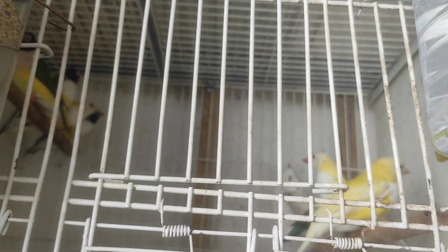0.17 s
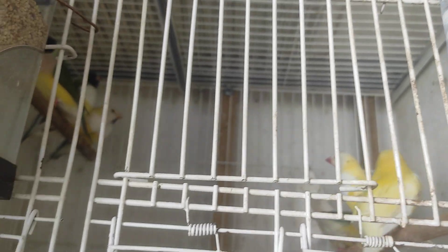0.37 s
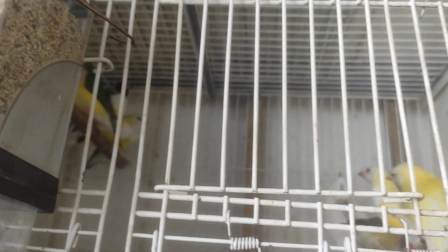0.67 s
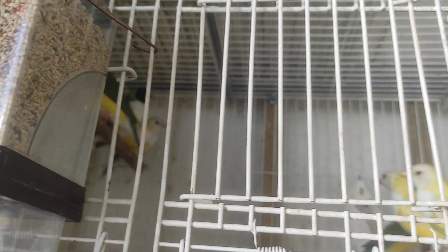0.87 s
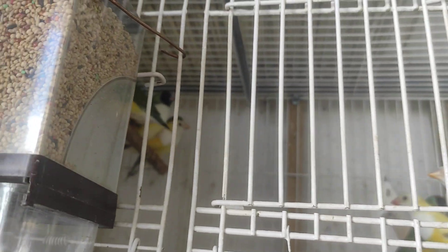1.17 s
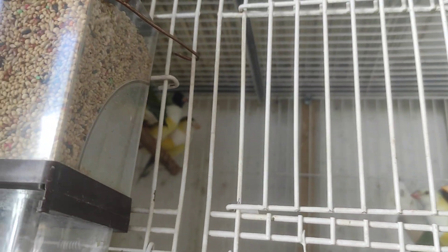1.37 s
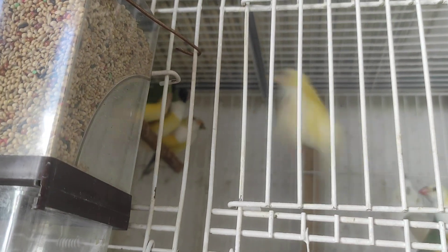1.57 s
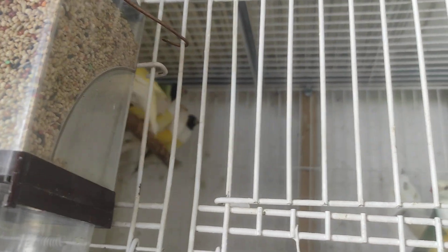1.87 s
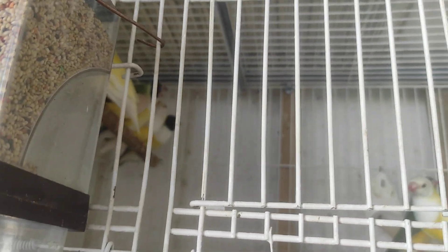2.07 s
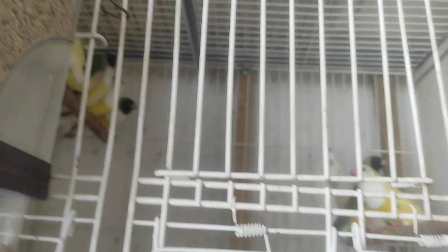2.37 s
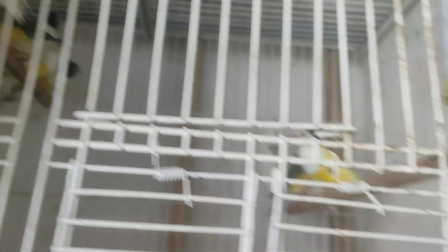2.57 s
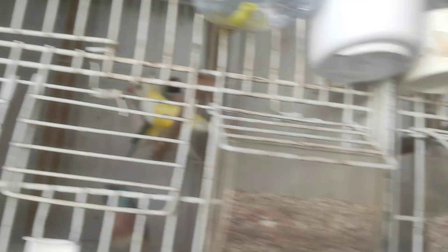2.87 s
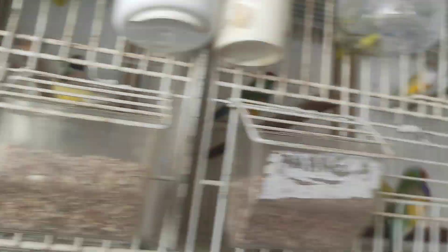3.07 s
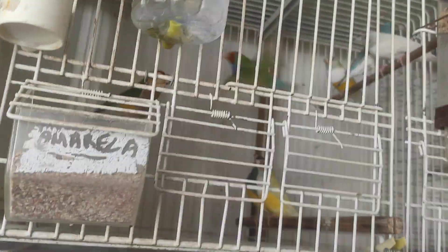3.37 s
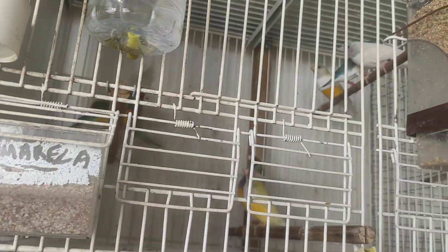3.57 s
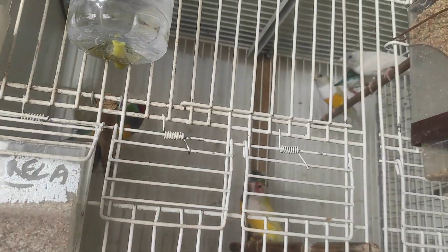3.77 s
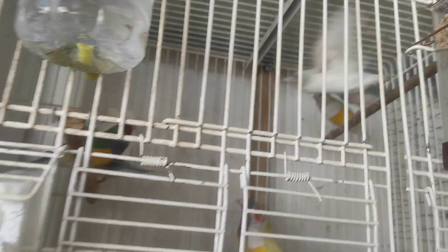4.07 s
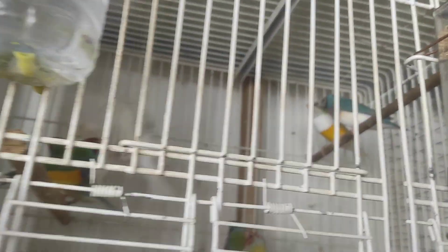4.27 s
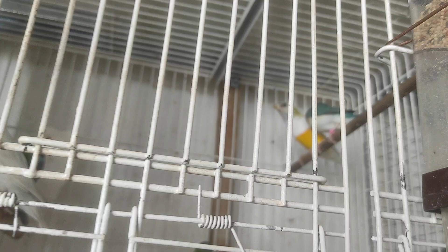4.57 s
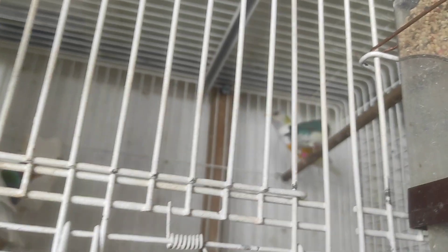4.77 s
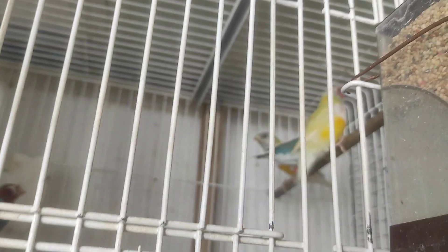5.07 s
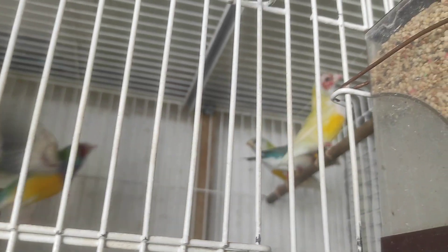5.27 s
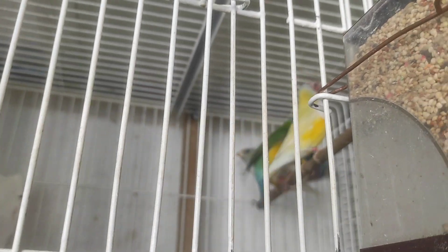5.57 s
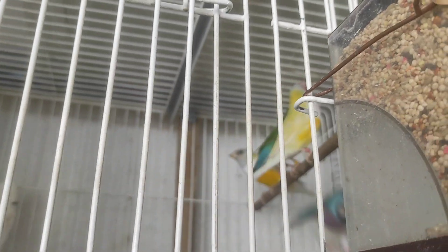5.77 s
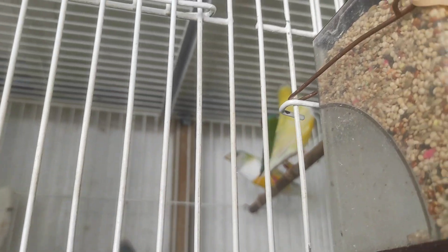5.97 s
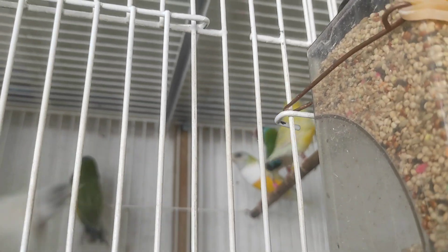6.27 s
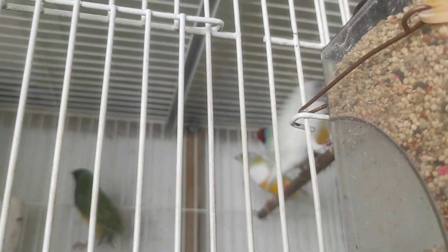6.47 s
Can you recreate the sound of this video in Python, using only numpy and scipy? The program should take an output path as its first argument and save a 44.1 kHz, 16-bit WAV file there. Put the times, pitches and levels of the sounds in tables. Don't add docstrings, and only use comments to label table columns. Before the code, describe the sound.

Finches whistle, peep and chatter hoarsely in a hard tiled room while wings flutter, claws tick on cage wire and a hand bumps the phone.

```python
import sys
import numpy as np
from scipy import signal
from scipy.fft import rfft, irfft, next_fast_len
from scipy.io import wavfile
from scipy.ndimage import uniform_filter1d, map_coordinates

SR = 44100
rng = np.random.default_rng(int(sys.argv[2]) if len(sys.argv) > 2 else 0)


def materialize(psi):
    bounded = np.clip(np.atleast_2d(psi).T, -1, 1)
    quanta = np.round(bounded * 32767).astype(np.int16)
    wavfile.write(sys.argv[1], SR, quanta)


def gain_from_decibels(decibels):
    exponent = np.asarray(decibels, float) / 20
    return 10 ** exponent


N = 292383

# frequency in Hz, level in dB per Hz.
WIRE_SPECTRUM = [(290, -35), (500, -9), (960, -5.5), (1090, -7.5), (2320, -7.5), (3300, -11.5), (5500, -29),
                 (7150, -50), (12100, -120)]
# frequency in Hz, level in dB per Hz.
FEATHER_SPECTRUM = [(1470, -21), (2500, -10), (3320, -14.5), (3720, -9.5), (4050, -8.5), (4370, -9.5),
                    (4750, -8.5), (5930, -6.5), (7580, -0.5), (8830, -5.5), (9830, -12.5), (14500, -21),
                    (15600, -25)]


def unit(x):
    return x / np.sqrt(np.mean(x ** 2) + 1e-20)


def along(points, hz):
    f, v = np.transpose(points)
    return np.interp(np.log(hz + 1), np.log(f + 1), v)


def wobble(rate, size):
    knots = rng.standard_normal(int(max(size, SR // 4) * rate / SR) + 4)
    return map_coordinates(knots, [np.arange(size) * rate / SR])


def sides(db):
    left = gain_from_decibels(db)
    return 2 * np.array([left, np.ones_like(left)]) / (1 + left)


def rush(spectrum, patchy_db):
    # frequency in Hz, left-right correlation as a ratio.
    likeness = [(60, 0.7), (180, 0.91), (550, 0.34), (1650, -0.066), (4970, 0.2), (15000, -0.5)]
    # frequency in Hz, left minus right in dB.
    port_balance = [(60, -0.5), (380, -1.5), (700, -2), (1290, -4), (2380, -8.5), (4400, -13.5),
                    (6000, -11.5), (7600, -18.5), (9500, -5.5), (15000, -2)]
    size = next_fast_len(N)
    z = signal.stft(rng.standard_normal((2, N + 512)), nperseg=512)[2]
    field = uniform_filter1d(rng.standard_normal(z.shape[1:]), size=6, axis=0)
    field = unit(uniform_filter1d(field, size=8, axis=1))
    patchy = z * gain_from_decibels(np.clip(patchy_db, 0, 2) * field)
    pair = rfft(signal.istft(patchy, nperseg=512)[1][:, :N], size)
    hz = np.fft.rfftfreq(size, 1 / SR)
    turn = np.arccos(np.clip(along(likeness, hz), -1, 1)) / 2
    mid, side = pair * [np.cos(turn), np.sin(turn)]
    ports = np.array([mid + side, mid - side])
    gain = gain_from_decibels(along(spectrum, hz)) * sides(along(port_balance, hz))
    x = irfft(ports * gain, size)[:, :N]
    return x / x.mean(axis=0).std()


def bursts(rows, db, rise, slower):
    power, t = np.zeros(N + SR), np.arange(SR // 2) / SR
    for (s, *_, t60), level in zip(rows, db):
        decay = gain_from_decibels(level - 60 * t / (slower * t60))
        start = max(round((s - rise) * SR), 0)
        power[start:][:len(t)] += (decay * (1 - np.exp(-t / rise))) ** 2
    return np.sqrt(power[:N])


def tail():
    # frequency in Hz, t60 in seconds.
    tile_decay = [(500, 0.083), (4000, 0.25), (10000, 0.16)]
    hz, t, z = signal.stft(rng.standard_normal((2, SR // 3)), SR, nperseg=256)
    fall_db = -60 * t / along(tile_decay, hz)[:, None]
    early = gain_from_decibels(fall_db / 0.6)
    late = gain_from_decibels(-9 + fall_db / 1.4)
    x = signal.istft(z * (early + late), SR, nperseg=256)[1]
    x *= 1 - np.exp(-np.arange(x.shape[1]) / SR / 0.0013)
    return x / np.linalg.norm(x[0])


def notes():
    # start in seconds, length in seconds, first pitch in Hz, last pitch in Hz, peak in dB.
    rises = [
        (.506, 0.028, 2955, 4300, -27.5),
        (2.1, .045, 3487, 4105, -27.5),
        (3.626, .056, 3130, 4050, -26.5),
        (3.996, .058, 3375, 4093, -25),
        (5.005, .055, 3510, 4310, -41.5),
        (6.148, 0.061, 3093, 3900, -28),
    ]
    # start in seconds, length in seconds, top pitch in Hz, held pitch in Hz, held level in dB.
    leaps = [
        (.232, 0.065, 5410, 4066, -19.5),
        (.808, 0.083, 5470, 4007, -18),
        (2.327, 0.075, 5100, 4025, -17.5),
    ]
    # start in seconds, length in seconds, first pitch in Hz, last pitch in Hz, peak in dB.
    peeps = [(.135, 0.051, 4080, 4100, -37), (.002, .085, 4530, 4400, -32), (.14, .045, 3520, 3900, -30),
             (.335, .1, 4110, 4080, -40), (3.668, .068, 4030, 4220, -35), (.18, 0.065, 3900, 4060, -29),
             (.306, 0.0255, 4470, 4036, -25.5), (.888, .014, 4060, 4070, -10.5),
             (.862, 0.012, 4035, 4044, -11.5), (.848, 0.031, 3715, 3820, -21),
             (1.1, 0.031, 2410, 2295, -54), (2.403, 0.061, 4074, 4100, -32.5),
             (2.887, 0.028, 4120, 3850, -34), (2.975, .068, 3810, 3800, -41),
             (2.912, 0.062, 3840, 3813, -30)]
    # start in seconds, length in seconds, first pitch in Hz, last pitch in Hz, peak in dB.
    chatter = [(0, 0.013, 4200, 4100, -24), (.02, .06, 2950, 2880, -39), (.805, .014, 4150, 4300, -25),
               (2.329, .024, 4750, 5000, -31), (.028, 0.045, 4330, 4295, -33),
               (.155, 0.03, 3350, 3450, -38), (.1, 0.048, 3600, 3680, -40), (.215, 0.029, 3500, 3770, -33),
               (.76, .03, 5850, 6100, -46.5), (.525, 0.028, 4300, 4250, -27.5),
               (.552, 0.06, 4240, 4280, -30.5), (.762, 0.036, 2660, 2920, -43.5),
               (.788, 0.032, 3450, 3770, -31), (.818, 0.041, 3450, 3820, -28.5),
               (4.28, 0.034, 5270, 5910, -45), (4.443, 0.046, 3650, 3690, -30),
               (4.452, 0.028, 4200, 4720, -30.5), (5.885, 0.021, 2730, 2440, -40),
               (6.188, 0.038, 4850, 4560, -36.5), (6.152, 0.058, 2680, 2680, -47),
               (6.32, .025, 2370, 2350, -51.5), (6.408, 0.051, 3156, 3170, -41),
               (6.41, 0.024, 5700, 5670, -39.5), (4.72, .06, 2990, 2970, -43), (.9, .012, 4650, 4720, -30),
               (.922, .016, 4650, 4750, -33), (2.886, .04, 4550, 4400, -43), (.1, .045, 5350, 5000, -44),
               (.515, .035, 3700, 3850, -35), (.56, .04, 3750, 3900, -35), (4.43, .04, 3050, 3200, -39),
               (4.748, .018, 5700, 5750, -42), (2.128, .05, 4230, 4150, -37), (.303, .025, 4900, 4500, -33),
               (.25, .055, 5400, 5250, -38), (.245, .08, 2950, 2850, -43), (.816, .035, 5500, 5350, -33),
               (.33, .05, 4850, 4800, -46), (2.335, .04, 5550, 5400, -43), (2.405, .03, 5300, 5250, -48),
               (.51, .04, 2950, 3000, -40), (.55, .045, 2800, 2950, -40), (4.0, .05, 2900, 3100, -42)]
    # start in seconds, length in seconds, first pitch in Hz, last pitch in Hz, peak in dB.
    coos = [
        (.2, 0.25, 553, 545, -51.5),
        (4.495, 0.048, 1450, 1513, -57),
        (4.82, 0.042, 985, 925, -46.5),
        (5.36, 0.0092, 1560, 840, -38),
        (6.02, 0.019, 1010, 980, -43),
        (6.54, 0.024, 950, 930, -46),
        (6.61, 0.014, 960, 910, -43),
    ]
    # start in seconds, length in seconds, first pitch in Hz, last pitch in Hz, peak in dB.
    buzzes = [
        (0, 0.028, 3730, 3580, -29.5),
        (.028, 0.049, 3420, 3590, -31.5),
        (.512, .025, 3490, 3760, -31.5),
        (.555, 0.044, 3274, 3620, -28.5),
        (.597, 0.029, 3625, 3510, -28.5),
        (2.086, 0.025, 3420, 3490, -36),
        (2.305, 0.03, 3480, 3450, -32),
        (4.42, 0.048, 2974, 3620, -34.5),
        (6.368, 0.034, 3470, 3790, -29),
    ]
    # start in seconds, length in seconds, first pitch in Hz, last pitch in Hz, peak in dB.
    sweeps = [
        (4.705, .07, 3257, 4380, -18.5),
        (6.385, 0.0514, 3700, 4326, -26.5),
    ]
    # left minus right in dB, octave level in dB, loudest moment as a share of the length,
    # loss at the start in dB, loss at the end in dB.
    rise_voice = (-15, -15, .55, 10.5, 11.5)
    leap_voice = (-15.5, -28, 2.5, 5, 4.5)
    peep_voice = (-16.5, -23.5, 0.2, 3.5, 5)
    chatter_voice = (-14, -16.5, 1.7, -0.5, 6)
    coo_voice = (-11.5, -29, -2, 5, 8)
    buzz_voice = (-17, -3.5, 0.44, 5.5, 6)
    sweep_voice = (-18, -19, 0.58, 15.5, 8)
    noisy_shares = .31, .1, .1, .42, .15, .3, .17
    # share of its height as a ratio, level in dB.
    side_strands = [(.35, -11), (-.35, -16), (.7, -14)]
    takeoff_hz, up_s, down_s = 3753, 0.019, 0.0065

    kinds = [(rises, rise_voice), (leaps, leap_voice), (peeps, peep_voice), (chatter, chatter_voice),
             (coos, coo_voice), (buzzes, buzz_voice), (sweeps, sweep_voice)]
    for (rows, (*voice, loudest, start_db, end_db)), hoarse in zip(kinds, noisy_shares):
        for s, length, a_hz, b_hz, db in rows:
            t = np.arange(0, length, 1 / SR)
            loss_at = [0, np.clip(loudest, 0.05, 0.95), 1]
            level_db = db - np.interp(t / length, loss_at, [start_db, 0, end_db])
            pitch = a_hz + (b_hz - a_hz) * (1 - (1 - np.minimum(t / length / 0.8, 1)) ** 1.3)
            if rows is leaps:
                height = np.where(t < up_s, t / up_s, np.exp(-(t - up_s) / down_s))
                floor_hz = np.where(t < up_s, takeoff_hz, b_hz)
                pitch = floor_hz * (1 - height) + a_hz * height
                level_db = level_db - 12.5 * height
                for reach, strand_db in side_strands:
                    strand = floor_hz + reach * (a_hz - b_hz) * height ** 0.5
                    yield s, strand, db + strand_db - 30 * (1 - height) ** 2, (*voice, 0.4)
            yield s, pitch, level_db, (*voice, hoarse)


def whistles():
    out = np.zeros((2, N + SR))
    left_lag = 20
    pulse_hz, attack_s, release_s = 220, 0.005, 0.03
    for s, pitch, db, (pan_db, overtone_db, rasp) in notes():
        t = s + np.arange(len(pitch)) / SR
        overtone_db = overtone_db - 23 * np.maximum(pitch / 1000 - 3.7, 0)
        phase = 2 * np.pi * np.cumsum(pitch * (1 + 0.0049 * wobble(147.4, len(t)))) / SR
        leap = uniform_filter1d(np.abs(np.gradient(pitch)) * SR, size=300)
        hoarse = np.clip(rasp + np.clip(leap / 45000 - 0.45, 0, 1), 0, 0.6)

        def shake(rate):
            return wobble(rate, len(t)) + 1j * wobble(rate, len(t))

        flutter = 1 - hoarse + hoarse * shake(600)
        flutter = flutter + (0.03 + 0.3 * hoarse) * shake(3000) + 0.08 * hoarse * shake(8000)
        beats = np.cumsum(pulse_hz * (1 + 0.2 * wobble(59, len(t)))) / SR + rng.random()
        pulses = 1 - (0.2 + rasp) * np.cos(np.pi * beats) ** 2
        overtones = np.exp(2j * phase) + gain_from_decibels(-36) * np.exp(3j * phase)
        octave = (flutter + 1.3 * hoarse * shake(1400)) * overtones
        tone = pulses * (flutter * np.exp(1j * phase) + gain_from_decibels(overtone_db) * octave)
        fade = np.minimum((t - s) / attack_s, (t[-1] - t) / (release_s * rasp))
        swell = gain_from_decibels(db - 8.5) * np.clip(fade, 0, 1) / tone.real.std()
        note = (tone * swell).real
        scattered = (tone * swell * (1 + 0.38 * shake(800))).real
        echo = signal.fftconvolve(scattered[None], tail(), axes=1)
        at = round(t[0] * SR)
        out[:, at:at + len(t)] += np.array([np.roll(note, left_lag), note]) * sides(pan_db)[:, None]
        out[:, at:at + echo.shape[1]] += gain_from_decibels(-6) * echo * sides(pan_db + 4.5)[:, None]
    return out[:, :N]


def bustle():
    # frequency in Hz, level in dB per Hz.
    rumble_spectrum = [(76, -9.5), (130, -6), (167, 3), (393, -6), (650, -8), (1200, -12), (1560, -30.5),
                       (2640, -120)]
    # frequency in Hz, level in dB per Hz.
    hum_spectrum = [(12, -45.5), (20, -3), (92, -6.5), (120, -8), (160, -40), (260, -120)]
    # time in seconds, level in dB.
    flock_activity = [(0, -64), (.35, -54), (.76, -69), (.9, -66), (1.51, -65.5), (1.79, -77),
                      (2.03, -70.5), (2.23, -63.5), (2.66, -68.5), (2.92, -57), (3.6, -56), (3.8, -63.5),
                      (4.28, -62), (4.85, -73), (5.13, -62.5), (5.5, -56.5), (5.88, -66), (6.15, -64), ]
    # time in seconds, level in dB.
    hand_swing = [(0, -71), (.35, -54.5), (.76, -68), (1.7, -61), (2.03, -63), (2.66, -62.5), (3.32, -49),
                  (3.8, -58.5), (4.28, -62.5), (4.78, -71), (5.13, -56.5), (5.52, -56.5), (5.88, -63.5),
                  (6.04, -54), (6.25, -62.5)]
    t = np.arange(N) / SR
    flock_db = np.interp(t, *np.transpose(flock_activity))
    swing_db = np.interp(t, *np.transpose(hand_swing))
    stir = 1.46 * wobble(16, N) + 1.53 * wobble(120, N)
    gusts_db = swing_db - 2.0 + 1.1 * wobble(10, N) + 2.37 * wobble(45, N)
    rumble = gain_from_decibels(gusts_db) * rush(rumble_spectrum, patchy_db=5.0)
    wire = gain_from_decibels(-67 + flock_db - flock_db.mean() + stir) * rush(WIRE_SPECTRUM, patchy_db=1)
    hum_db = -67 + 0.4 * (swing_db - swing_db.mean()) + 1.5 * wobble(5, N)
    hum = gain_from_decibels(hum_db) * rush(hum_spectrum, patchy_db=0.0)
    feathers = gain_from_decibels(flock_db + stir) * rush(FEATHER_SPECTRUM, patchy_db=0.6)
    return hum + rumble + wire + feathers


def contacts():
    # start in seconds, peak in dB, dying time in seconds.
    swishes = [(.005, -38.5, 0.15), (.25, -44, 0.45), (0.516, -40, 0.15), (.564, -43, 0.27),
               (.85, -44.5, 0.6), (0.766, -48, 0.37), (0.797, -45, 0.61), (1.306, -47, 0.26),
               (1.4782, -48.5, 0.82), (2.09, -41.5, 0.3), (2.141, -40, .19), (2.319, -45, 0.66),
               (2.5017, -45.5, .1), (2.6017, -49, 0.23), (3.3273, -50, 0.11), (3.641, -39, 0.48),
               (3.961, -47.5, 0.66), (4.0082, -41, 0.16), (4.347, -48, 0.42), (4.423, -41, 0.18),
               (6.379, -40, 0.4)]
    # start in seconds, peak in dB, thump in dB, dying time in seconds.
    hops = [(.2224, -47, -20, 0.11), (.3212, -36.5, 1.5, 0.1), (1.1817, -48.5, -21, 0.18),
            (1.666, -50, 12.5, 0.1), (1.77, -51.5, 0, 0.11), (2.032, -57.5, -12, 0.32),
            (2.6736, -50.5, 5, 0.54), (2.737, -45.5, 3, 0.28), (2.847, -45.5, -36, 0.29),
            (3.007, -39, -13, 0.11), (3.205, -40.5, -1, 0.19), (4.65, -47, -11, 0.41),
            (4.6796, -48, 5.5, 0.44), (4.9287, -55.5, -19, 0.49), (4.992, -52.5, 11.5, .45),
            (5.086, -44, 10, 0.062), (5.435, -35.5, 0, 0.16), (4.002, -42, -17.5, 0.32),
            (6.153, -47.5, -20, .4), (5.395, -48, 14, 0.062), (6.593, -51, 7.5, 0.082)]
    # start in seconds, wing beats (count), peak in dB, thump in dB.
    flights = [
        (5.215, 2, -40.5, -14),
        (5.345, 2, -43, 5),
        (5.519, 2, -35, -0.5),
        (5.820, 2, -41.5, -23),
        (5.956, 3, -41, -4),
        (6.092, 2, -50.5, -22),
    ]
    beat_s, beat_t60_s, beat_grow_db = 0.045, 0.18, 2.5
    rows = [(s, db, -24.5, -17.5, t60) for s, db, t60 in swishes]
    rows += [(s, db, thump_db, -7.5, t60) for s, db, thump_db, t60 in hops]
    for s, beats, db, thump_db in flights:
        k = np.arange(beats)
        for i in k:
            beat_db = db + beat_grow_db * (i - k.mean())
            rows.append((s + beat_s * i, beat_db, thump_db, -12, beat_t60_s))
    return rows


def flaps():
    # frequency in Hz, level in dB per Hz.
    thump_spectrum = [(80, -37.5), (160, 11.5), (300, 7), (700, 3), (1300, -13), (3000, -38.5)]
    rows = contacts()
    _, db, thump_db, wire_db, _ = np.transpose(rows)
    grain = unit(gain_from_decibels(2.6 * wobble(500, N)))
    feathers = bursts(rows, db - 6, rise=0.003, slower=1.01) * grain * rush(FEATHER_SPECTRUM, 1.2)
    wire = bursts(rows, db + wire_db, rise=0.0093, slower=1.41) * grain * rush(WIRE_SPECTRUM, 3.0)
    thump = bursts(rows, db + thump_db - 11.5, rise=0.0029, slower=0.96) * rush(thump_spectrum, 4.5)
    return feathers + wire + thump


def ticks():
    # start in seconds, peak in dB, low share in dB, dying time in seconds.
    bar_ticks = [(0.3225, -37, -14, 0.031), (1.475, -37, -34, 0.013), (1.769, -49.5, -13.5, 0.049),
                 (2.845, -44.5, -13, 0.011), (4.349, -30, -28, 0.016), (4.3667, -40, -28, 0.02),
                 (4.621, -43, -31, .015), (4.678, -44, 8, 0.02), (5.217, -48, 13, 0.016),
                 (5.363, -43, 9, 0.021), (5.432, -41, 0, 0.044), (5.563, -32, -17, 0.027),
                 (5.8192, -38, -17, 0.036), (0.796, -38.5, -25, .04), (6.594, -45, -16.5, 0.027),
                 (6.094, -44, -6, .02), (6.006, -39, -12, 0.022), (6.0474, -35, 0, 0.027),
                 (6.3776, -44, -18, 0.03)]
    # start in seconds, peak in dB, dying time in
    # seconds.
    broad_clicks = [
        (6.0468, -33, .025),
        (6.006, -39, .025),
        (5.434, -37, .03),
        (5.5625, -37, .03),
        (4.348, -39, .012),
        (5.344, -43, .04),
        (5.2596, -42, .03),
    ]
    # frequency in Hz, level in dB per Hz.
    beak_spectrum = [(2500, -23), (4500, -8.5), (6200, 5.5), (7500, 17.5), (9000, 2), (11000, -8),
                     (14000, -9), (16000, -32)]
    # frequency in Hz, level in dB per Hz.
    snap_spectrum = [(800, -25), (2200, -3), (4500, -8), (7500, 0), (9500, -9), (14000, -11), (16000, -30)]
    _, db, low_db, _ = np.transpose(bar_ticks)
    snap_db = np.transpose(broad_clicks)[1]
    bright = bursts(bar_ticks, db - 7, rise=0.00018, slower=1.0) * rush(beak_spectrum, 0.58)
    snaps = bursts(broad_clicks, snap_db - 7, rise=0.0003, slower=1.0) * rush(snap_spectrum, 0.5)
    dull = bursts(bar_ticks, db + low_db - 7, rise=0.00067, slower=0.77) * rush(WIRE_SPECTRUM, 0.88)
    return snaps + bright + dull


def knocks():
    # start in seconds, left minus right in dB, strength in dB, hardness in dB per octave.
    pad_knocks = [
        (2.343, 31, -27, -5.5),
        (3.1558, -23.5, 2.1, 0.8),
        (4.136, 30, -38.5, -11),
    ]
    # start in seconds, left minus right in dB, strength in dB, hardness in dB per octave.
    nail_taps = [
        (2.7736, -14.5, -10.5, 0.24),
    ]
    # frequency in Hz, t60 in seconds, rise in seconds.
    case_modes = [(7500, 0.0027, 0.00015), (4500, 0.00057, 0.000036), (1850, 0.0021, 0.000075),
                  (986, 0.0078, 0.0002), (788, 0.014, 0.0019), (555, 0.0074, 0.0008), (306, 0.012, 0.0035),
                  (178.4, 0.044, 0.0024)]
    pad_levels = [-36, -15.5, -22, -14, -6.5, -1.1, 9.5, -16.5]
    nail_levels = [-0.5, -40, -2.5, -4, 1.5, -5, 3.5, -14]
    out, t = np.zeros((2, N)), np.arange(SR // 5) / SR
    blows = [(*row, pad_levels) for row in pad_knocks] + [(*row, nail_levels) for row in nail_taps]
    for s, pan_db, blow_db, hard_db, modes_db in blows:
        for k, (mode_db, (hz, t60, rise)) in enumerate(zip(modes_db, case_modes)):
            db = mode_db + blow_db + hard_db * np.log2(hz / 500)
            envelope = gain_from_decibels(db - 60 * t / t60) * (1 - np.exp(-t / rise)) ** 2
            swing = (-1) ** k * envelope * np.sin(2 * np.pi * hz * t)
            out[:, round(s * SR):][:, :len(t)] += swing * sides(pan_db - 1.8 * hz / 1000)[:, None]
    return out


def scene():
    return whistles() + bustle() + flaps() + ticks() + knocks()


def band_limit(x):
    return signal.sosfilt(signal.butter(12, 15700, fs=SR, output="sos"), x)


def record(dry):
    return band_limit(dry)


dry = scene()
out = record(dry)
materialize(out)
```